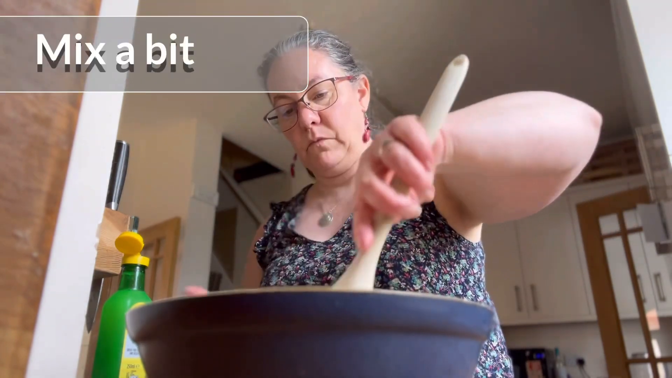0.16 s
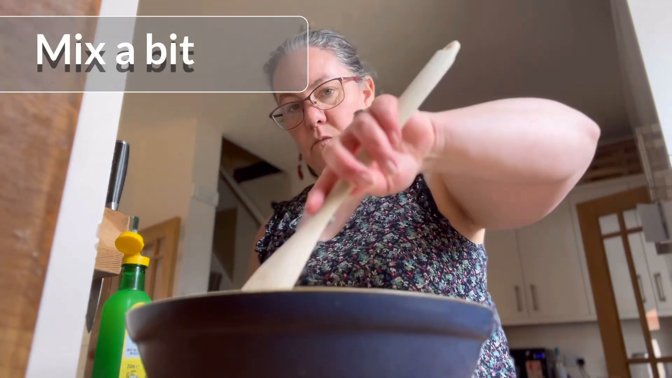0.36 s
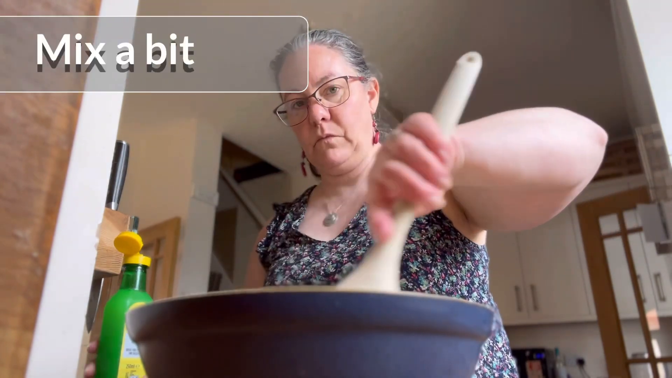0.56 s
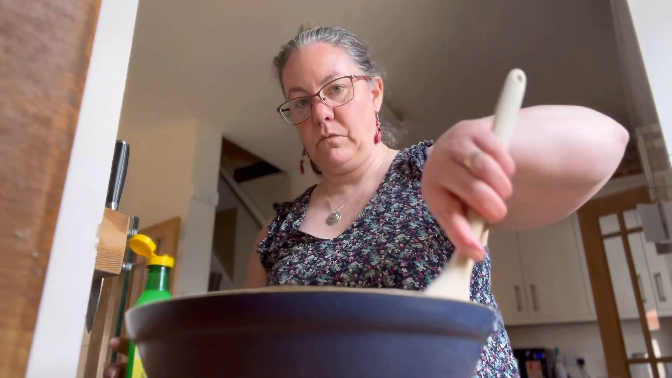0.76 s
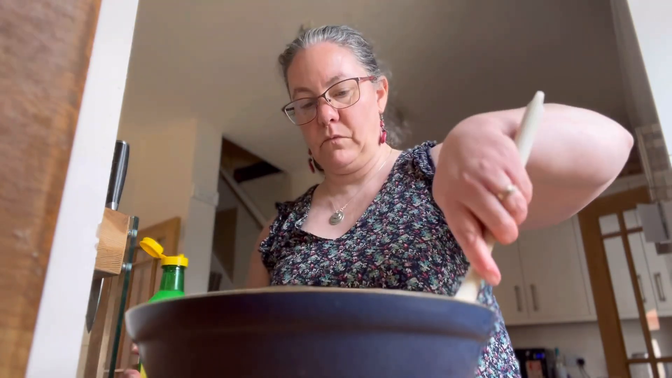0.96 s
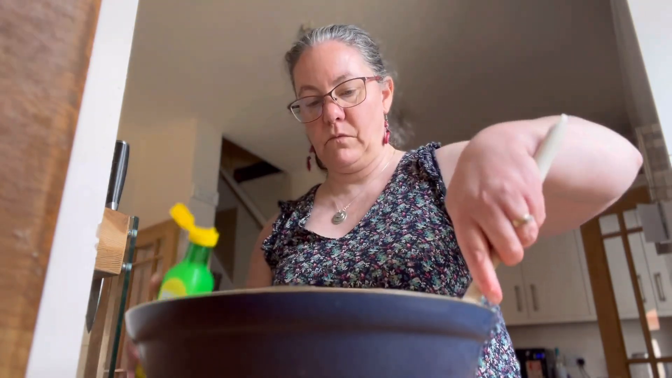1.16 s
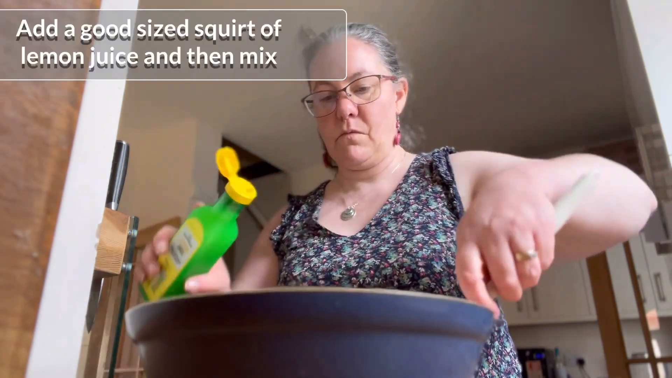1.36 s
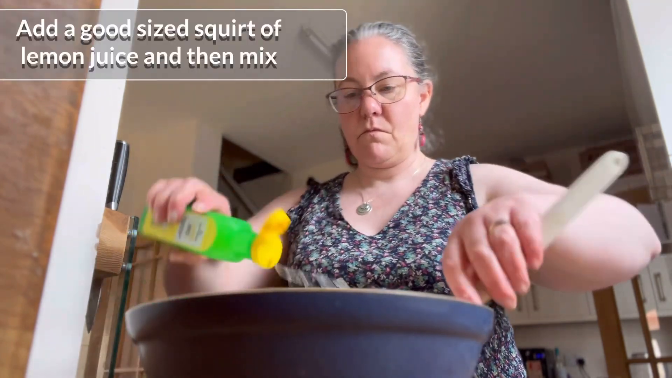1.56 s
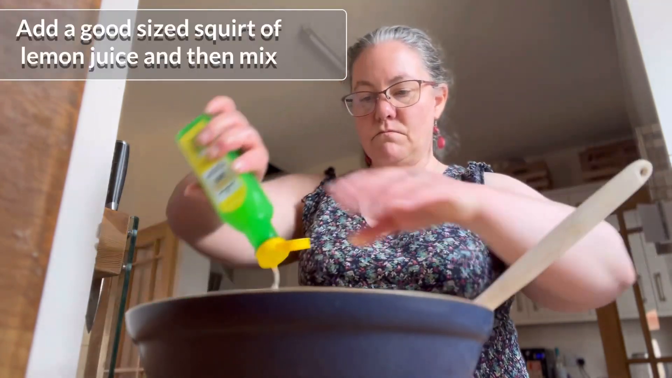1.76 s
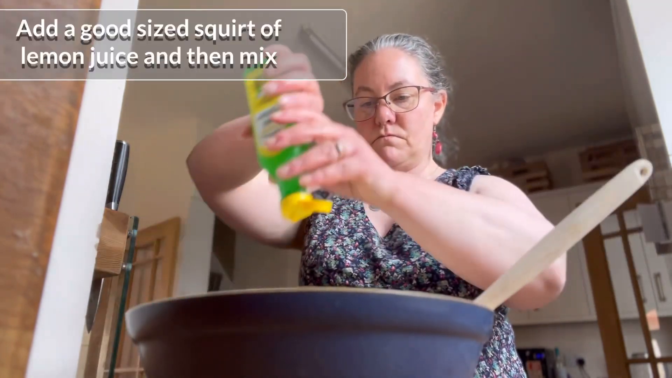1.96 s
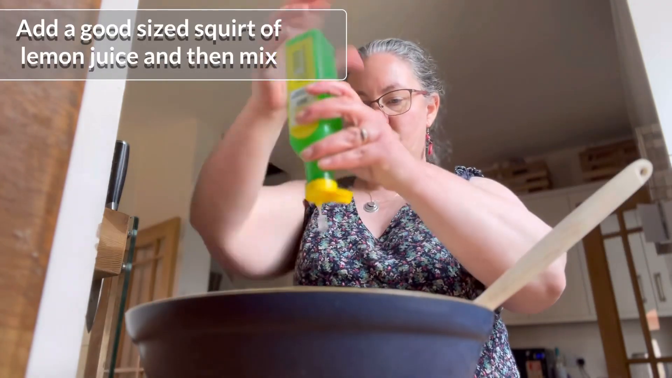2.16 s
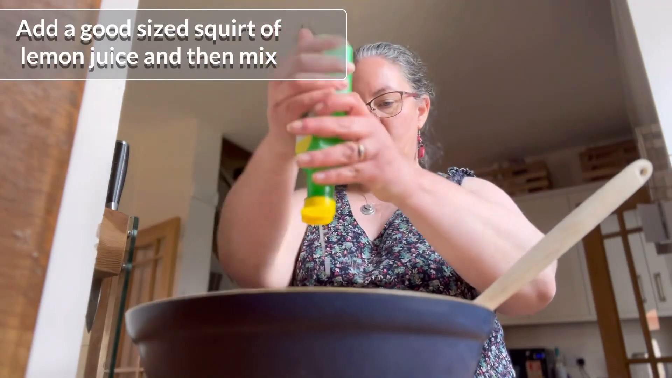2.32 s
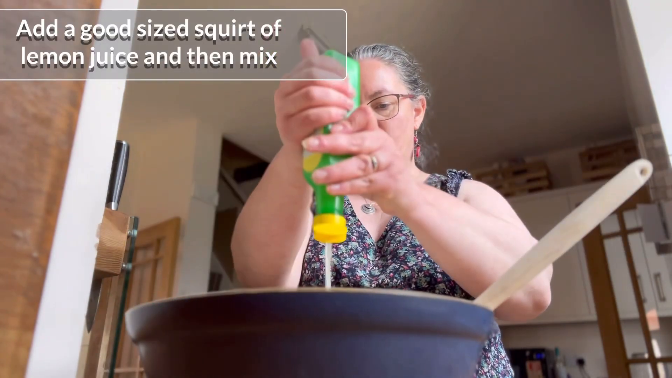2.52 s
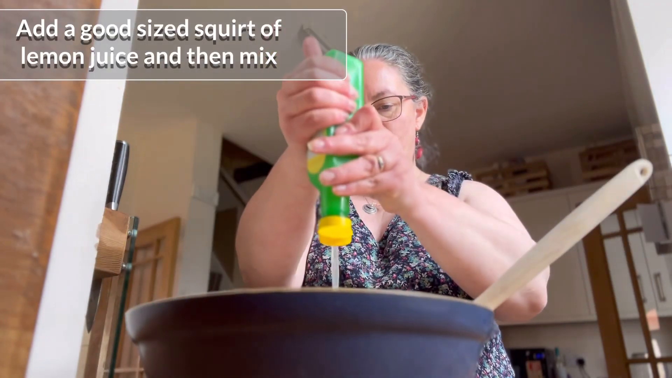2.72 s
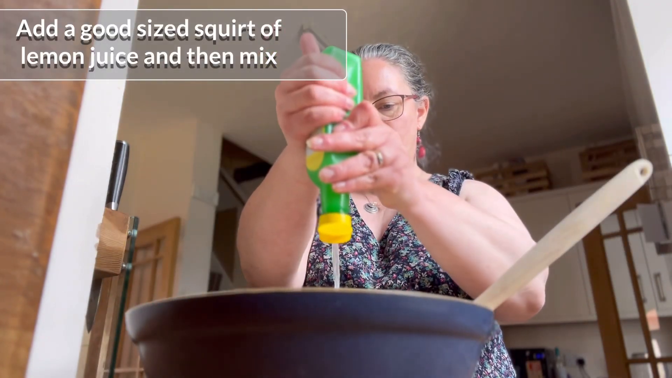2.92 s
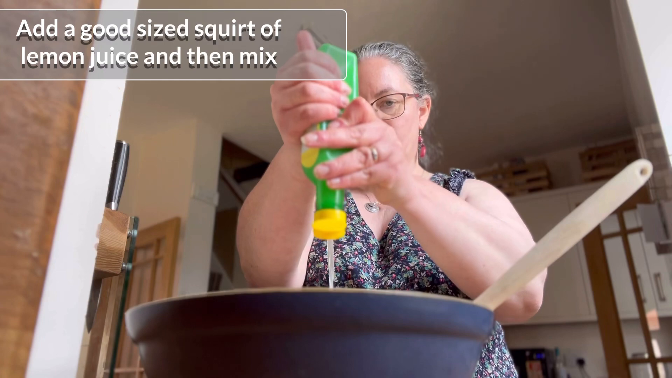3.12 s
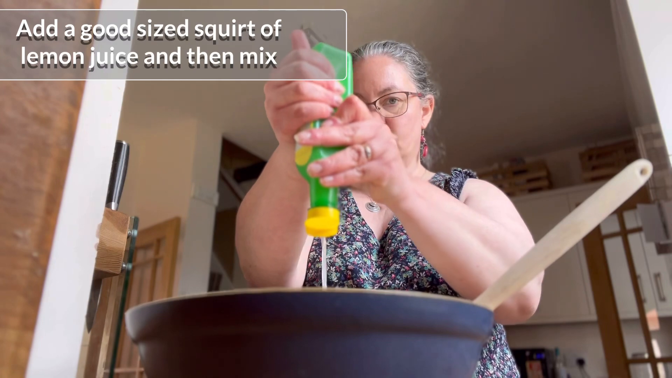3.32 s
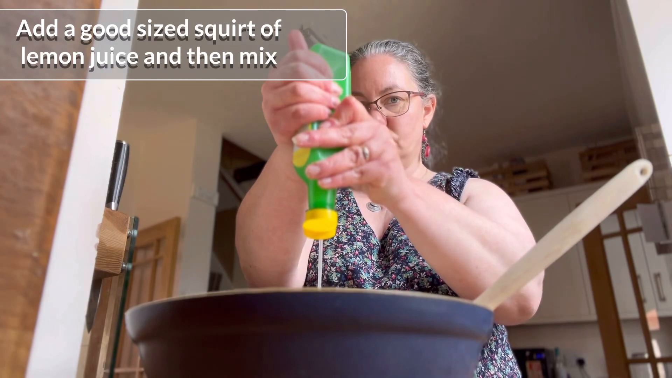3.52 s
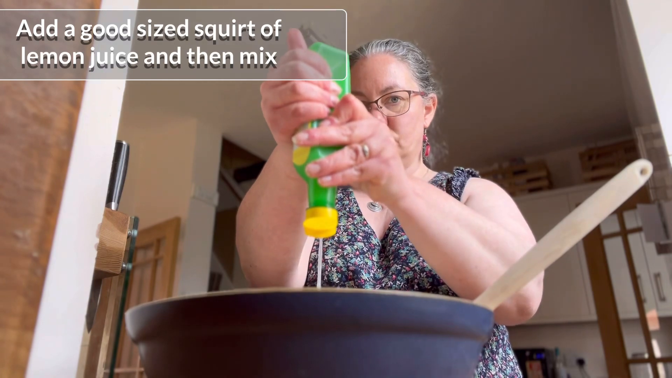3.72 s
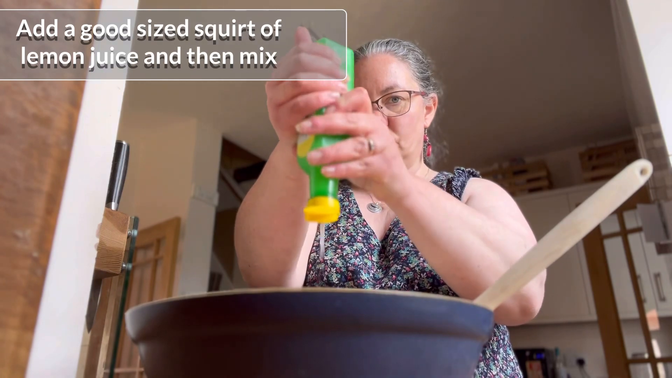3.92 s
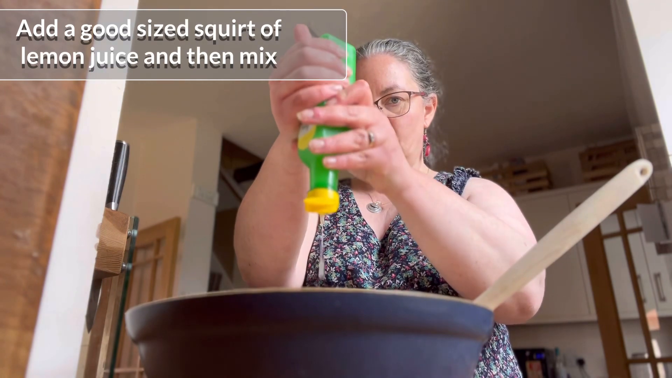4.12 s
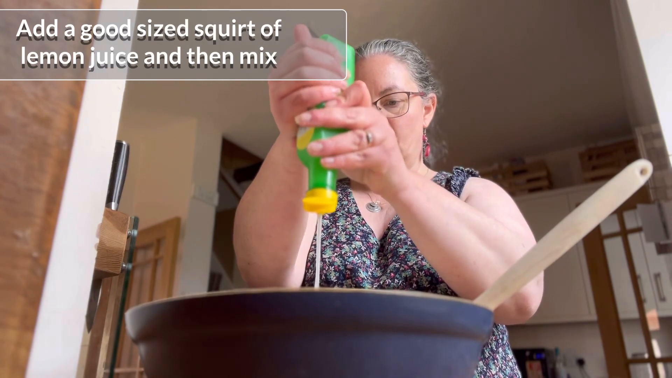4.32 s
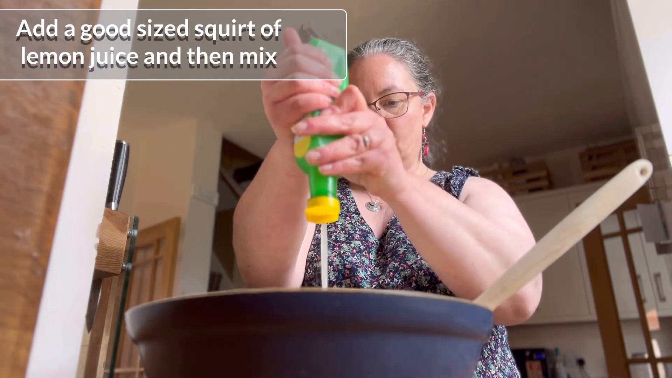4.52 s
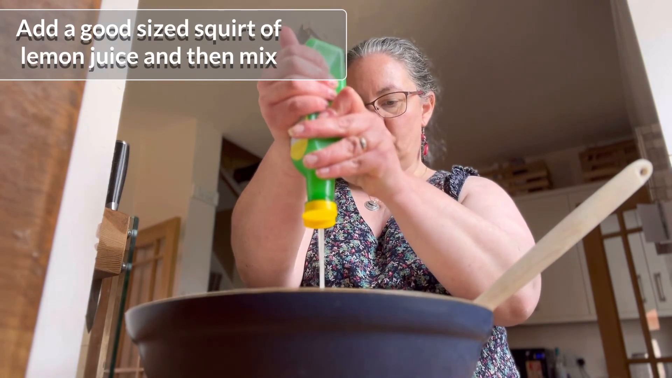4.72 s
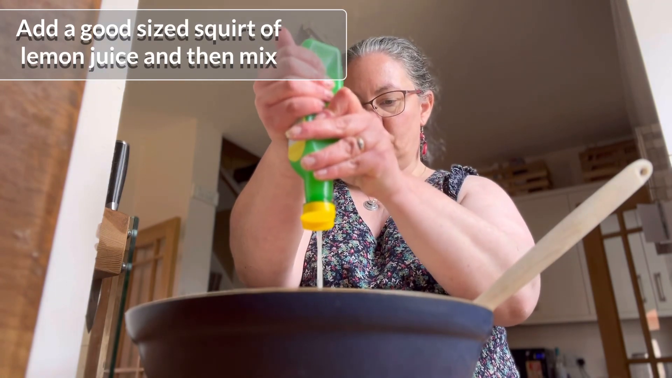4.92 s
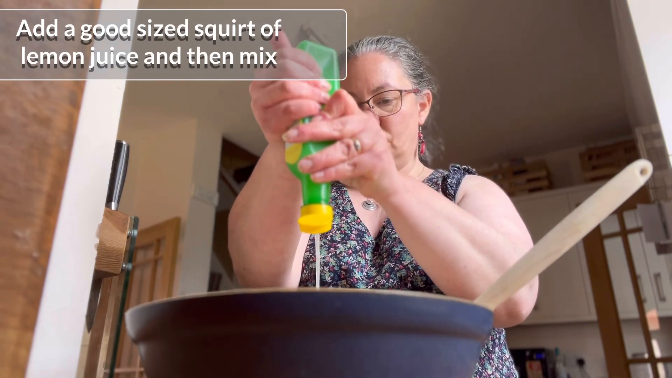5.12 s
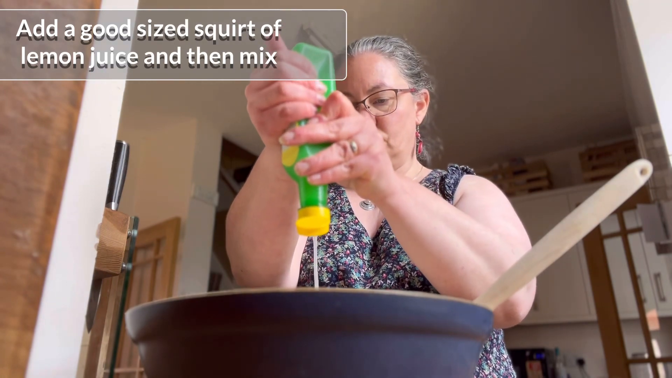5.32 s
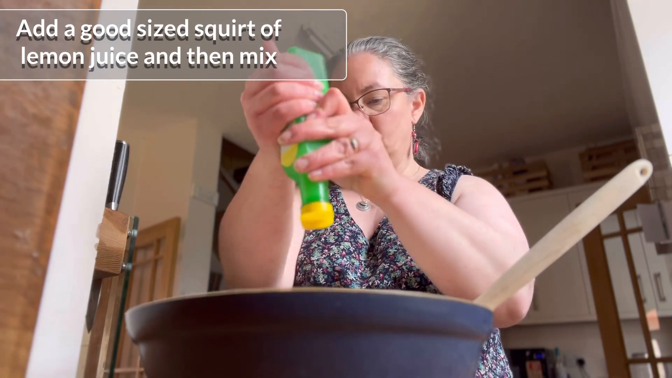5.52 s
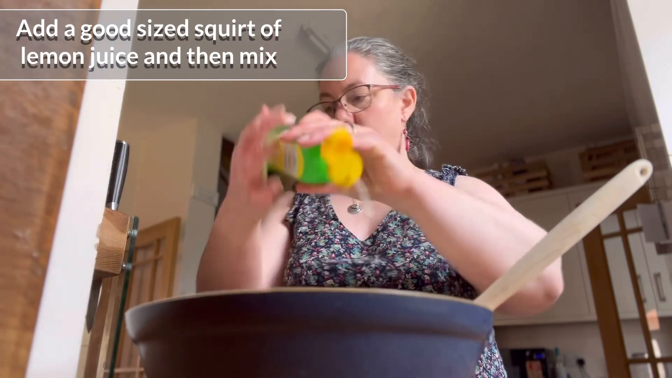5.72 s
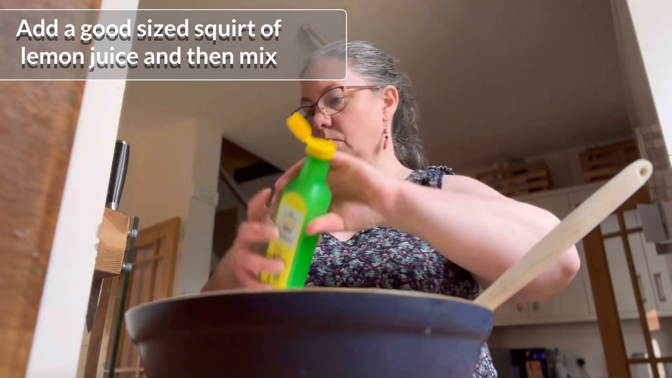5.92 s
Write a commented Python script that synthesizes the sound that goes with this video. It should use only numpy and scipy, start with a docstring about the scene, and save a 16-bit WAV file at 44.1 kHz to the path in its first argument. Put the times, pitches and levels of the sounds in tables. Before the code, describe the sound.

Close stereo microphones by a big ceramic bowl in a quietly humming, slightly live kitchen. Dry crumbs crunch and shift under a wooden spoon, which thuds, squeaks faintly on the glaze and then clonks brightly against the rim. Plastic clicks and buckles. A thin stream of juice patters, the bottle pops and sucks air with bright spits, then a stronger, splashier squeeze ends in a bigger pop, fizzing bubbles and soft handling.

```python
"""Dry mix and squeezed juice

A wooden spoon strokes a dry crumbly mix in a big ceramic bowl, then drops against the rim: shaped grains and struck modes.
A plastic bottle is squeezed twice: juice patters on the mix (grains, bubbles), and each time the wall pops back and
the nozzle spits and gulps air (band-passed bursts, decaying notes).
Close microphone pair in a small kitchen with a low appliance hum (coloured noise and sines)."""
import sys
import numpy as np
from scipy import signal
from scipy.fft import rfft, irfft, next_fast_len
from scipy.io import wavfile

SR = 44100
rng = np.random.default_rng(int(sys.argv[2]) if len(sys.argv) > 2 else 0)


def generate_wav(signal):
    """Clip the signal to [-1, 1] and save it as 16-bit WAV at the path in sys.argv[1]."""
    frames = np.transpose(np.atleast_2d(signal))
    scaled = np.clip(frames, -1, 1) * 32767
    pcm = np.round(scaled).astype(np.int16)
    wavfile.write(sys.argv[1], SR, pcm)


N = 267687
CONTACT_HZ = 7000   # the wood is too soft to excite modes far above this


def stirring():
    """The spoon shoves the mix along the bowl; crumbs break and grind under it and keep the ceramic faintly ringing."""
    # spoon strokes: start t/s, rise/s, hold/s, push/dB, crumb crunch/dB, scrape/dB
    strokes = [(0.0, 0.0011, 0.005, -51.5, -65, -82), (0.411, 0.013, 0.21, -59, -60, -69),
               (0.558, 0.031, 0.032, -48.5, -56.5, -61), (0.65, 0.025, 0.0073, -48, -57, -49.5),
               (0.723, 0.0091, 0.024, -51, -59, -54), (0.914, 0.023, 0.56, -78, -73, -93),
               (1.157, 0.25, 0.16, -53, -66.5, -54)]
    # spectra of push, crunch and scrape: f/Hz, density/dB
    push_spectrum = [(120, -39.5), (200, -8), (232, -4.5), (433, -7), (481, 6.5), (633, -22.5), (1020, -9),
                     (1220, -22.5), (1370, -21.5), (2500, -25), (3250, -61.5), (5500, -120)]
    crunch_spectrum = [(1200, 2), (2200, -13.5), (3200, -3.5), (5000, -2), (7500, -4), (11000, -7.5),
                       (15000, -1.5)]
    scrape_spectrum = [(480, -1), (750, 8), (1020, 2.5), (1400, -5.5), (1900, -4.5), (2800, -12.5),
                       (3800, -22), (5000, -21)]
    # bowl modes kept ringing by rubbing, damped by the spoon: f/Hz, level/dB, t60/s
    rubbed_modes = [(511, 0, .1), (1053, -1, .08), (1820, -7, .08), (2750, -7, .08), (3862, -5, .1)]
    # clumps of crumbs crushed against the wall: start t/s, rise/s, hold/s, level/dB, f/Hz
    crushes = [(.478, 0.011, 0.015, -56, 2040), (.575, 0.011, 0.017, -59.5, 2170),
               (.682, .006, 0.013, -52.5, 3000), (.729, .002, 0.0095, -55.5, 2460)]
    stroke_fade_db_per_s = 129   # the mix settles after a stroke
    ringing_db, crumbs_gain_db = -9, 1

    push, crunch, grind = (efforts([(*row[:3], row[k]) for row in strokes], stroke_fade_db_per_s)
                           for k in range(3, 6))
    shove = push * coloured(grains(500, spread_db=1.5, clump_db=6.0, clump_rate=73), push_spectrum)
    scrape = grind * coloured(grains(1100, spread_db=5.5, clump_db=7.5, clump_rate=110), scrape_spectrum)
    grit = grains(2400, spread_db=1.0, clump_db=4.0, clump_rate=39)
    wall = struck(rubbed_modes, CONTACT_HZ)
    rubbing = np.hypot(crunch, grind) * unit(grit)
    ringing = amp(ringing_db) * signal.fftconvolve(rubbing, wall / np.linalg.norm(wall))[:N]
    crumbs = crunch * coloured(grit, crunch_spectrum)
    crumbs += flurries(crushes, octaves=0.9, fade_db_per_s=400)
    return kitchen(shove + amp(crumbs_gain_db) * crumbs + scrape + ringing, wet_db=1.0, bass_pan_db=-4)


def singing():
    """Wood sticking and slipping on the glaze keeps a tone of the bowl sounding, slightly unsteady."""
    # sung tones: start t/s, rise/s, hold/s, level/dB, f/Hz
    sings = [(0.54, 0.054, 0.21, -61, 492), (.715, 0.02, 0.039, -51.5, 930), (.70, .03, 0.065, -72, 3500),
             (0.63, 0.026, 0.059, -79, 4300), (0.58, .02, .03, -64, 4300), (1.6, 0.032, 0.076, -62.5, 1816)]
    fade_db_per_s, waver_hz, flutter_db = 238, 14, 3.5
    out = 0
    for *gesture, hz in sings:
        phase = 2 * np.pi * np.cumsum(hz + waver_hz * drift(60)) / SR
        tone = unit(amp(flutter_db * drift(70)) * np.sin(phase))
        out = out + efforts([gesture], fade_db_per_s) * tone
    return kitchen(out, wet_db=-10.5)


def bowl():
    """Blows set the ceramic ringing and thud through to the counter; lumps give way with a dull bump."""
    # spoon against bowl: t/s, ring/dB, ring tilt/(dB/octave), ping/dB, thud/dB,
    # wood/dB, wood f/Hz, wood width/octave, tick/dB
    knocks = [(0.423, -45.5, -11.5, -44, -28.5, -23.5, 459, 0.27, -37),
              (1.33, -48, -3.5, -70.5, -49, -32, 784, 1.4, -35.5),
              (1.4759, -44.5, 1.5, -78, -44.5, -34.5, 527, 1.9, -39.5),
              (1.5921, -7, -1, -57.5, -18.5, -34, 615.5, 0.84, -54)]
    # ceramic modes, before tilt: f/Hz, level/dB, t60/s
    bowl_modes = [(237, -24, .25), (276, -27, .25), (398, -31, .3), (511, -24, .26), (716, -24, .15),
                  (867, -23, .24), (947, -17, .11), (1007, -9, .15), (1053, 0, .125), (1083, -8, .15),
                  (1138, -12, .13), (1211, -11, .12), (1260, -15, .14), (1318, -13, .18), (1362, -17, .14),
                  (1410, -21, .16), (1495, -21, .17), (1808, -11.5, .1), (1825, -14, .16),
                  (2748, -12.5, .08), (2925, -22, .05), (3866, -13.5, .075), (5146, -26, .14),
                  (6600, -25, .13), (6625, -35, .2), (8215, -44, .2)]
    # broad resonances of the bowl wall, and of the counter under it: level/dB, low f/Hz, high f/Hz, t60/s
    clatter = [(-22.5, 570, 1560, 0.39), (-12, 830, 1600, 0.09), (-16.5, 600, 1200, 0.048),
               (-19.5, 1700, 2500, 0.034), (-21.5, 2300, 3300, 0.045), (-32.5, 1100, 4400, 0.24),
               (-32.5, 2600, 7500, 0.12)]
    thud = [(0, 92, 370, 0.15), (-3.5, 125, 185, 0.085), (-8, 84, 110, 0.059), (-22.5, 47, 70, .4)]
    # lumps giving way under the spoon: t/s, level/dB, f/Hz
    lumps = [(0.596, -58, 500), (.635, -43, 417), (.73, -38.5, 850), (0.996, -49, 540), (1.301, -48.5, 698),
             (1.447, -48.5, 740), (1.539, -37.5, 450)]
    # a finger ring grazing the rim: t/s, level/dB
    tinks = [(1.4757, -36.5)]
    # modes the finger ring excites: f/Hz, level/dB, t60/s
    tink_modes = [(3468, -10, .3), (3490, -13, .2), (3530, -9, .09), (3360, -8, .05), (3650, -7, .05),
                  (3760, -10, .06), (5093, -24, .11), (6422, -12, .12), (6530, -10, .05), (6713, -22, .12)]
    lump_octaves, lump_t60_s = 1, 0.027
    tick_low_hz, tick_high_hz, tick_t60_s = 2432, 13430, 0.0047   # the moment of contact
    wood_t60_s = 0.046   # the spoon's own clack
    thud_delay_s = 0.003   # the counter answers a little after the bowl
    ping_hz, ping_t60_s = 3862, 0.16

    parts = [(s, db, *around(hz, lump_octaves), lump_t60_s) for s, db, hz in lumps]
    for s, ring_db, _, _, thud_db, wood_db, wood_hz, wood_octaves, tick_db in knocks:
        parts += [(s, ring_db + db, *shape) for db, *shape in clatter]
        parts += [(s + thud_delay_s, thud_db + db, *shape) for db, *shape in thud]
        parts.append((s, wood_db, *around(wood_hz, wood_octaves), wood_t60_s))
        parts.append((s, tick_db, tick_low_hz, tick_high_hz, tick_t60_s))
    out = bursts(parts, snap=0.21)
    for s, ring_db, tilt, ping_db, *_ in knocks:
        modes = [(hz, db + tilt * np.log2(hz / 1000), t60) for hz, db, t60 in bowl_modes]
        ring = amp(ring_db) * struck(modes, CONTACT_HZ)
        ping = amp(ping_db) * note(ping_hz, ping_t60_s, swell_s=0.0005)
        add(out, s, ring + ping)
    for s, db in tinks:
        add(out, s, amp(db) * struck(tink_modes, bright_hz=12020))
    return kitchen(out, wet_db=-5.5, bass_pan_db=-2)


def juice():
    """The jet breaks into drops that patter, bubble and hiss on the mix; a hard jet also drums on it."""
    # hands press the bottle: start t/s, rise/s, hold/s, patter/dB (before gain), spray/dB
    squeezes = [(2.496, 0.089, 0.14, -52, -53), (2.909, 0.037, 0.39, -57.5, -58.5),
                (3.166, 0.082, 0.076, -54, -58.5), (4.055, 0.027, 0.47, -70, -73),
                (4.386, 0.19, 0.34, -44, -41), (4.925, 0.09, 0.058, -56, -50.5)]
    # spectra of patter, spray and drumming: f/Hz, density/dB
    patter_spectrum = [(200, -4), (310, -3), (430, -10), (540, 2), (630, 0), (720, 1), (810, -1.5),
                       (860, -4), (925, 2), (1010, -2), (1060, -6), (1160, -13), (1340, -9), (1460, -12),
                       (1570, -9), (1690, -11), (1820, -7.5), (2050, -14), (2400, -14), (3000, -22)]
    spray_spectrum = [(2000, -7.5), (2800, -3.5), (3900, 5.5), (5500, -0.5), (7200, 1.5), (9000, -1.5),
                      (11000, 0), (13000, 5.5), (15400, -1)]
    drum_spectrum = [(90, -17), (150, -2), (210, -4), (310, -1.5), (420, -23.5), (700, -52)]
    # slugs of juice slapping the mix: t/s, level/dB, f/Hz
    slaps = [(4.503, -55, 700), (4.586, -34, 680), (4.641, -23.5, 676), (4.66, -38, 760), (4.722, -39, 650),
             (4.8, -49, 730), (4.857, -34.5, 583), (4.885, -57, 630)]
    # jet splutters into a puff of spray: start t/s, rise/s, hold/s, level/dB, f/Hz
    puffs = [(4.602, 0.0092, 0.019, -39, 3640), (4.712, 0.0065, 0.014, -48, 4800),
             (4.94, 0.0085, 0.022, -45, 4650), (5.068, 0.0025, 0.0079, -48.5, 6600)]
    patter_fade_db_per_s, spray_fade_db_per_s = 51.5, 60.5   # as the grip eases the spray fades faster
    spray_sag_db_per_s = 27   # under a steady grip the jet gathers and sprays less
    patter_gain_db, bubble_gain_db, splutter_gain_db = 3.0, -6.0, -6.5
    full_flow_db, drum_power = -41, 2.05   # drumming grows faster than the patter
    slap_octaves, slap_t60_s = 0.98, 0.029

    patter = efforts([(*timing, db) for *timing, db, _ in squeezes], patter_fade_db_per_s)
    spray = efforts([(*timing, db) for *timing, _, db in squeezes], spray_fade_db_per_s, spray_sag_db_per_s)
    gush = amp(1.3 * drift(55))   # the jet arrives in uneven slugs
    drops = grains(1100, spread_db=3, clump_db=3.5, clump_rate=82)
    mist = grains(3500, spread_db=0.5, clump_db=5.5, clump_rate=62)
    full = amp(full_flow_db)
    drum = full * (patter / full) ** drum_power * coloured(drops, drum_spectrum)
    splash = amp(patter_gain_db) * patter * coloured(drops, patter_spectrum)
    splash += spray * coloured(mist, spray_spectrum)
    low_bubbles = patter * spatter(120, 500, 1050, spread_db=3)
    high_bubbles = spray * spatter(220, 3300, 8000, spread_db=6)
    bubbles = amp(bubble_gain_db) * (low_bubbles + high_bubbles)
    # bigger drops splat in clumps
    big_drops = grains(290, spread_db=3.5, clump_db=0.5, clump_rate=28)
    splash += amp(splutter_gain_db) * spray * unit(band(big_drops, 1140, 5500))
    splats = bursts([(s, db, *around(hz, slap_octaves), slap_t60_s) for s, db, hz in slaps], snap=0.33)
    sputters = flurries(puffs, octaves=0.8, fade_db_per_s=352)
    wet_mix = kitchen(gush * (splash + drum) + splats + sputters, wet_db=7.5, bass_pan_db=-3.5)
    return wet_mix + kitchen(bubbles, wet_db=12.0)


def bottle():
    """The wall buckles and springs back, bubbles burst and fingers rub the plastic."""
    # wall buckling: t/s, note/dB, rattle/dB, f/Hz, t60/s
    pops = [(1.979, -29, -37.5, 630, 0.047), (2.046, -28, -35.5, 639, 0.022), (2.067, -42, -45, 468, 0.09),
            (2.228, -38, -42, 738, 0.19), (2.946, -41.5, -46, 926, 0.076), (3.738, -37.5, -19.5, 840, 0.03),
            (3.7411, -47.5, -41.5, 220, 0.137), (3.7467, -22, -27, 940, 0.035),
            (3.8071, -21.5, -28, 595, 0.08), (3.869, -59, -30.5, 760, 0.093),
            (3.91, -61, -24.5, 836, 0.014), (3.959, -45.5, -58, 850, 0.077),
            (4.017, -33.5, -39.5, 394, 0.046), (5.453, -30, -34.5, 714, 0.021),
            (5.4692, -16, -29, 603, 0.043), (5.499, -16, -22, 457, 0.047), (5.553, -20, -41, 190, 0.044),
            (5.579, -36, -40.5, 1334, 0.058), (5.807, -33, -40.5, 582, 0.056)]
    # grip lets go and the wall springs back: t/s, level/dB
    releases = [(3.8078, -18.5), (5.469, -16.5)]
    # set off by each release (wall, sway, slosh, splash, fizz): delay/s, level/dB, low f/Hz, high f/Hz, t60/s
    recoil = [(0, 0, 435, 736, 0.026), (.002, -22, 71.6, 139, 0.38), (.003, -5, 139, 328, 0.22),
              (0.01, -1.5, 520, 1200, .03), (.011, -22.5, 1300, 4400, 0.19)]
    # single bubbles in nozzle and bottle: t/s, level/dB (before gain), f/Hz
    blips = [(2.058, -36.5, 5960), (3.693, -40.5, 3620), (3.869, -29, 1770), (3.91, -31.5, 1900),
             (3.985, -38, 1800), (4.037, -43, 2150), (4.252, -47, 2000), (4.29, -49, 3900),
             (4.587, -26, 1790), (5.098, -35, 1900), (5.124, -38, 2000), (5.166, -30, 1700),
             (5.237, -31, 1840), (5.259, -32, 6000), (5.27, -35, 1780), (5.493, -15, 6460),
             (5.565, -29.5, 1820), (5.724, -42.5, 3700), (5.757, -50, 2100), (5.794, -45.5, 2044),
             (5.817, -41, 1530), (5.837, -38, 3720), (5.95, -40, 2230)]
    # fingers shifting on the bottle: start t/s, rise/s, hold/s, rub/dB
    handling = [(5.66, 0.057, 0.011, -54), (5.8, 0.021, 0.21, -58.5), (5.918, 0.0049, 0.0036, -46.5),
                (6.025, 0.016, 0.0064, -58)]
    # rub spectrum: f/Hz, density/dB
    rub_spectrum = [(400, -2), (700, 10.5), (2000, -2), (4000, -5), (7500, -10), (11000, -12.5),
                    (15000, -9)]
    pop_octaves, pop_swell_s, blip_gain_db = 1.7, 0.00082, 7.5
    froth_db, froth_rise_s, froth_hold_s, froth_fade_db_per_s = -76, 0.2, 0.24, 36
    rub_fade_db_per_s = 180

    rattles = [(s, db, *around(hz, pop_octaves), t60) for s, _, db, hz, t60 in pops]
    recoils = [(s + delay, db + part_db, *shape)
               for s, db in releases for delay, part_db, *shape in recoil]
    out = bursts(rattles + recoils, snap=0.35)
    for s, db, _, hz, t60 in pops:
        add(out, s, amp(db) * note(hz, t60, pop_swell_s))
    for s, db, hz in blips:
        add(out, s, amp(db + blip_gain_db) * bubble(hz, cycles=14.2))
    # froth keeps bursting in the bottle after each release
    froth = efforts([(s, froth_rise_s, froth_hold_s, froth_db) for s, _ in releases], froth_fade_db_per_s)
    out += froth * unit(band(grains(350, spread_db=5, clump_db=4, clump_rate=17), 1620, 4700))
    rubbing = grains(1100, spread_db=-2.5, clump_db=10.0, clump_rate=52)
    out += efforts(handling, rub_fade_db_per_s) * coloured(rubbing, rub_spectrum)
    return kitchen(out, wet_db=3, bass_pan_db=-2.0)


def gulps():
    """Air rushing back in sets the bottle's cavity booming on one low note."""
    # air gulped back: t/s, level/dB
    gulp_times = [(3.861, -21), (5.556, -22)]
    cavity_hz, t60_s, swell_s = 151, 0.38, 0.0056
    boom = np.zeros(N)
    for s, db in gulp_times:
        add(boom, s, amp(db) * note(cavity_hz, t60_s, swell_s))
    return kitchen(band(boom, 90, 900), wet_db=-14)


def ticks():
    """Short bright nozzle spits and cap clicks, close to the microphone: crackling band-passed bursts."""
    # wet spits at the nozzle: t/s, level/dB, f/Hz, t60/s
    nozzle_spits = [(2.946, -50.5, 4500, .03), (3.229, -48.5, 4770, 0.056), (3.544, -59, 4400, 0.087),
                    (3.7391, -38.5, 11500, 0.028), (3.742, -55, 5040, 0.4), (3.808, -38, 10500, 0.016),
                    (3.8189, -31, 5500, 0.027), (3.82, -25.5, 12100, 0.022), (3.8267, -36.5, 6400, 0.012),
                    (3.8404, -8.5, 11100, 0.0024), (3.847, -35, 10400, 0.017), (3.852, -55, 4600, 0.02),
                    (3.8745, -41.5, 10000, 0.0057), (3.891, -19.5, 13600, 0.008),
                    (3.8954, -42, 11800, 0.0058), (5.068, -32.5, 5750, 0.023), (5.154, -50, 12000, 0.033),
                    (5.166, -57, 7000, 0.028), (5.238, -40.5, 8750, 0.011), (5.256, -40.5, 5900, 0.065),
                    (5.271, -54, 9800, .03), (5.4699, -36.5, 11500, 0.041), (5.4757, -15.5, 6700, 0.0098),
                    (5.4788, -33, 3560, 0.021), (5.495, -28, 9200, 0.013), (5.4989, -16, 7660, 0.0061),
                    (5.525, -31, 12200, 0.02), (5.5602, -29.5, 13800, 0.012), (5.58, -36, 3700, 0.025)]
    # dry clicks of the plastic cap: t/s, level/dB
    cap_clicks = [(1.98, -47), (2.228, -39), (4.0155, -43.5), (5.922, -36.5), (6.039, -40)]
    spit_octaves, spit_top_hz = 1.63, 16500
    click_low_hz, click_high_hz, click_t60_s = 1680, 14900, 0.0064
    spits = [(s, db, *np.minimum(around(hz, spit_octaves), spit_top_hz), t60)
             for s, db, hz, t60 in nozzle_spits]
    clicks = [(s, db, click_low_hz, click_high_hz, click_t60_s) for s, db in cap_clicks]
    # each is a cluster of uneven little bursts
    crackles = bursts(spits + clicks, snap=0.29, crackle_db=4.5)
    return kitchen(crackles, wet_db=-2.5)


def background():
    """Still air as coloured noise and the slightly wavering hum of an appliance as sines."""
    # air spectrum: f/Hz, density/dB
    air_spectrum = [(40, 3.5), (60, 2), (125, -0.5), (250, 2), (450, -0.5), (650, -6), (1000, -17.5),
                    (2000, -21), (4000, -31.5), (7000, -33.5), (14000, -34)]
    # hum lines: f/Hz, level/dB rms (before pan)
    hum_lines = [(49.2, -56), (98.5, -62.5), (150, -76.5)]
    air_db, hum_pan_db = -62.5, 6.0
    t = np.arange(N) / SR
    air = coloured(rng.standard_normal(N), air_spectrum)
    air = amp(air_db) * air / np.std(band(air, 130, 15000))
    hum = 0
    for hz, db in hum_lines:
        level = amp(db + 0.38 * drift(11.0)) * np.sqrt(2)
        hum = hum + level * np.sin(2 * np.pi * hz * t + 0.15 * drift(2.8))
    hum_sides = hum * amp(hum_pan_db * np.array([[0.5], [-0.5]]))
    return kitchen(air, wet_db=7.5, bass_pan_db=-2.5) + hum_sides


def kitchen(x, wet_db, bass_pan_db=0, early_s=0.021, early_db=7):
    """Direct sound at two microphones, early reflections from bowl and counter, and a tail that dies by band."""
    # reverberation: f/Hz, t60/s
    room_t60 = [(120, 0.14), (300, 0.96), (600, 0.4), (2000, 0.62), (4000, 0.5), (7000, 0.28),
                (14000, 0.25)]
    # colour of the reflections: f/Hz, level/dB
    room_colour = [(100, 3), (250, -3), (420, -1.5), (570, -1), (760, -5.5), (1100, -3), (5000, -2),
                   (9000, 5), (13000, -3.5)]
    # likeness of the reflections at the two microphones: f/Hz, likeness/(0-1)
    likeness = [(120, 0.8), (300, 0), (1000, 0), (5800, .1), (7500, .5), (8450, 1), (9600, 1), (10600, .5),
                (11400, 1), (13000, 1), (13700, .5), (14500, 1)]
    # microphone pair: f/Hz, L-R level/dB
    balance = [(50, -4.5), (150, 8.5), (300, 11.5), (550, 5), (1100, 2), (2200, 1.5), (4000, 6),
               (7500, -1.5), (9000, -0.5), (12000, 0.5), (15000, 1)]
    # microphone pair: f/Hz, phase by which left leads/rad
    lead = [(50, -0.5), (150, 0.32), (280, 1.4), (560, -1.4), (1050, 1.3), (2200, 1), (5200, 1.7),
            (6000, -1.2), (7200, -1.4), (8450, -3.1), (9700, -3.2), (11200, -6.2), (13000, -6.4),
            (14400, -9.4)]
    t = np.arange(SR * 2 // 5) / SR
    edges, tail = np.geomspace(70, 18000, 13), 0
    for low, high in zip(edges, edges[1:]):
        decay = np.exp(-np.log(1000) * t / at_hz(room_t60, np.sqrt(low * high)))
        decay = decay * (1 + amp(early_db) * np.exp(-t / early_s))
        part = band(rng.standard_normal((2, len(t))) * decay * (t > 0.0015), low, high)
        part = part / np.linalg.norm(part, axis=1, keepdims=True)
        tail = tail + np.sqrt(2 * (high - low) / SR) * part
    size = next_fast_len(N + len(t))
    hz, sides = np.arange(size // 2 + 1) * SR / size, np.array([[1], [-1]])
    mid, side = rfft(tail, size) * amp(wet_db + at_hz(room_colour, hz))
    alike = np.clip(at_hz(likeness, hz), 0, 1)
    path = 1 + np.sqrt((1 + alike) / 2) * mid + sides * np.sqrt((1 - alike) / 2) * side
    pan_db = at_hz(balance, hz) + bass_pan_db / (1 + (hz / 480) ** 4)
    ports = amp(sides * pan_db / 2) * np.exp(1j * sides * at_hz(lead, hz) / 2)
    return irfft(rfft(x, size) * path * ports / np.hypot(1, amp(wet_db)), size)[:, :N]


def efforts(rows, fade_db_per_s, sag_db_per_s=0):
    """Gain curve of gestures (start s, rise s, hold s, dB): each swells, holds or sags, then fades."""
    t, power = np.arange(N) / SR, 0
    for start, rise, hold, db in rows:
        held = t - start - rise
        swell = np.sin(np.pi / 2 * np.clip((t - start) / rise, 0, 1)) ** 2
        loss_db = sag_db_per_s * np.clip(held, 0, hold) + fade_db_per_s * np.maximum(held - hold, 0)
        power = power + (swell * amp(db - loss_db)) ** 2
    return np.sqrt(power)


def grains(per_s, spread_db, clump_db, clump_rate):
    """Random tiny impacts of uneven size that come in clumps."""
    size_db = spread_db * np.minimum(rng.exponential(1, N), 4) + clump_db * drift(clump_rate)
    return amp(size_db) * rng.choice([-1, 1], N) * (rng.random(N) < per_s / SR)


def flurries(rows, octaves, fade_db_per_s):
    """Short showers of grains (start s, rise s, hold s, dB, Hz), each in its own band."""
    grit = grains(1800, spread_db=2.0, clump_db=6, clump_rate=120)
    return sum(efforts([gesture], fade_db_per_s) * unit(band(grit, *around(hz, octaves)))
               for *gesture, hz in rows)


def bursts(rows, snap, crackle_db=0):
    """Each is a snap and a quickly dying rattle, ringing in its own band; dB is its rms at the start."""
    out, t = np.zeros(N), np.arange(SR // 3) / SR
    for s, db, low_hz, high_hz, t60 in rows:
        decay = np.exp(-np.log(1000) * t / t60) + 1e-12
        size = np.linalg.norm(decay)
        uneven = np.interp(t * 1000, np.arange(340), rng.standard_normal(340))   # one knot per ms
        force = decay * amp(crackle_db * uneven) * rng.standard_normal(len(t))
        force = force / np.linalg.norm(force)
        force[0] += snap
        sound = band(force, low_hz, high_hz)
        add(out, s, amp(db) * size * sound / np.linalg.norm(sound))
    return out


def struck(modes, bright_hz):
    """Decaying modes after one blow; a soft contact spares the high ones."""
    t, out = np.arange(SR * 3 // 4) / SR, 0
    for k, (hz, db, t60) in enumerate(modes):
        mode = (-1) ** k * amp(db - 60 * t / t60) * np.sin(2 * np.pi * hz * t)
        out = out + mode / np.hypot(1, (hz / bright_hz) ** 2)
    return out


def note(hz, t60, swell_s):
    """One resonance that swells briefly and dies away."""
    t = np.arange(SR * 3 // 4) / SR
    return (1 - np.exp(-t / swell_s)) * np.exp(-np.log(1000) * t / t60) * np.sin(2 * np.pi * hz * t)


def bubble(hz, cycles, rise=0.031):
    """A bubble dies by 60 dB over the given cycles, its pitch rising as it nears the surface."""
    age = np.arange(0, 1, hz / (cycles * SR))
    swell = 1 - np.exp(-age / 0.091)
    return swell * amp(-60 * age) * np.sin(2 * np.pi * cycles * (age + rise * age ** 2))


def spatter(per_s, low_hz, high_hz, spread_db):
    """Bubbles of random pitch and size burst at random moments; rms 1."""
    out = np.zeros(N)
    draws = rng.random((6000, 4))
    for when, pitch, size, turn in draws[:int(per_s * N / SR)]:
        hz = low_hz * (high_hz / low_hz) ** pitch
        gain = np.sign(turn - 0.5) * amp(spread_db * min(-np.log(size), 3))
        add(out, when * (N - 1) / SR, gain * bubble(hz, cycles=27.6))
    return unit(out)


def drift(rate):
    """Random curve joining knots of spread 1, rate knots a second."""
    knots = rng.standard_normal(4096)
    return np.interp(np.arange(N) / SR * rate, np.arange(len(knots)), knots)


def coloured(x, spectrum):
    """Give a signal a spectrum that falls steeply beyond its ends; rms 1."""
    size = next_fast_len(N)
    hz = np.maximum(np.arange(size // 2 + 1) * SR / size, 1)
    ends = (1 + (spectrum[0][0] / hz) ** 8) * (1 + (hz / spectrum[-1][0]) ** 8)
    return unit(irfft(rfft(x, size) * amp(at_hz(spectrum, hz)) / np.sqrt(ends), size)[:N])


def band(x, low_hz, high_hz):
    """Causal band-pass."""
    edges = np.clip([low_hz, max(high_hz, low_hz * 1.05)], 10, [0.42 * SR, 0.45 * SR])
    return signal.sosfilt(signal.butter(3, edges, "band", fs=SR, output="sos"), x)


def around(hz, octaves):
    """Edges of a band centred on hz."""
    return hz / 2 ** (octaves / 2), hz * 2 ** (octaves / 2)


def at_hz(points, hz):
    """Read a table on a log-frequency axis."""
    f, value = np.transpose(points)
    return np.interp(np.log(np.maximum(hz, 1)), np.log(f), value)


def amp(db):
    """Decibels to gain."""
    return 10 ** (np.asarray(db) / 20)


def unit(x):
    """Scale to rms 1."""
    return x / np.sqrt(np.mean(x ** 2) + 1e-20)


def add(track, s, sound):
    """Mix a sound into a track at time s."""
    start = round(s * SR)
    track[start:start + len(sound)] += sound[:N - start]


def scene():
    """Everything that sounds in the kitchen."""
    return stirring() + singing() + bowl() + juice() + bottle() + gulps() + ticks() + background()


def record(dry):
    """The highest peaks are rounded and the top of the treble is cut steeply."""
    cutoff_hz = 16500
    rounded = dry / (1 + np.abs(dry / 0.95) ** 6) ** (1 / 6)
    return signal.sosfilt(signal.ellip(10, 0.2, 100, cutoff_hz, fs=SR, output="sos"), rounded)


dry = scene()
out = record(dry)
generate_wav(out)
```